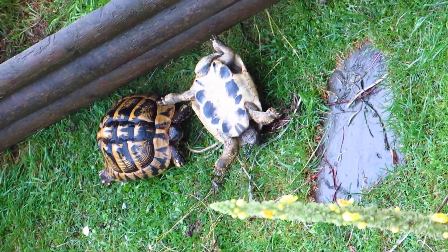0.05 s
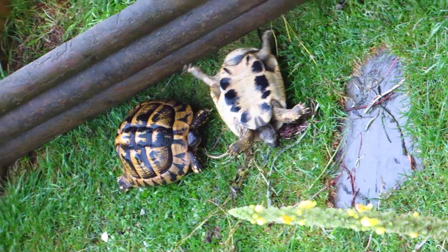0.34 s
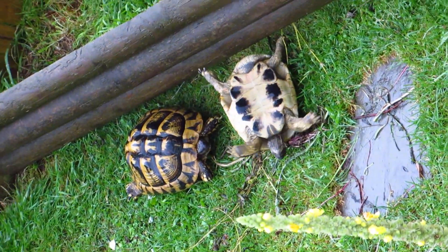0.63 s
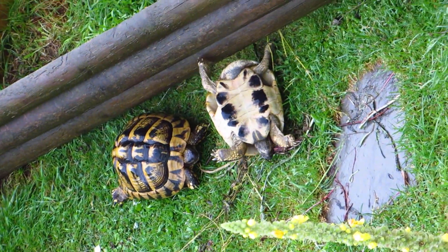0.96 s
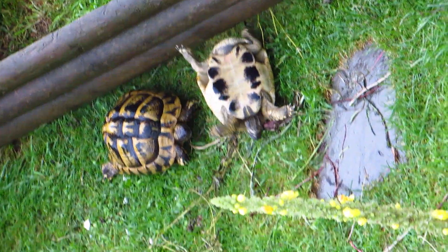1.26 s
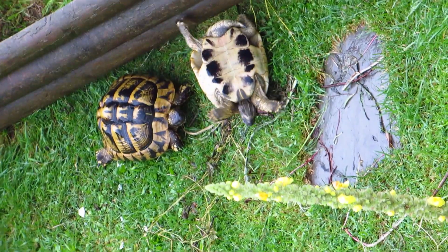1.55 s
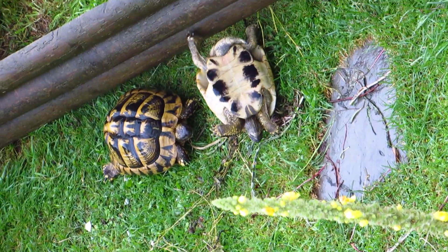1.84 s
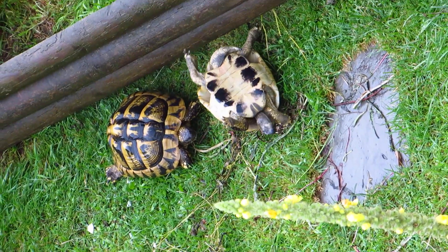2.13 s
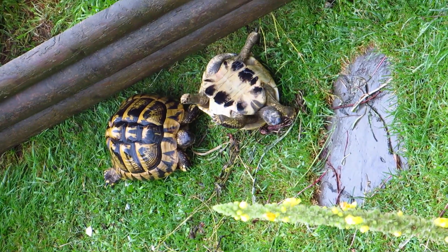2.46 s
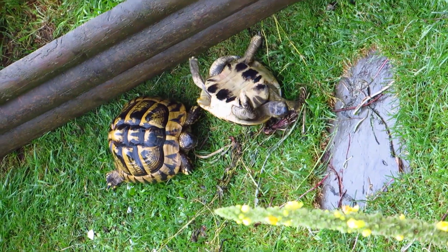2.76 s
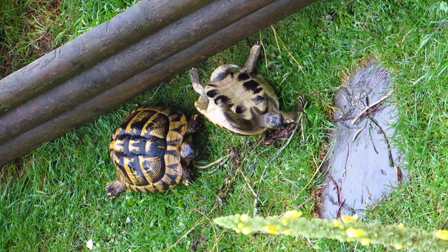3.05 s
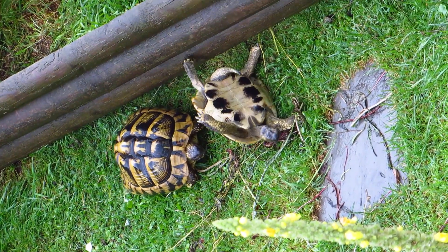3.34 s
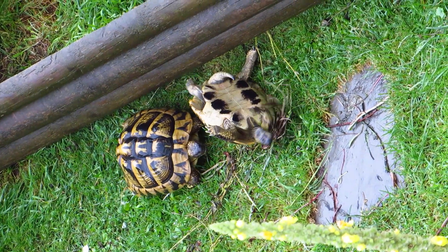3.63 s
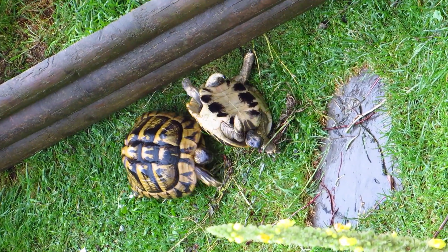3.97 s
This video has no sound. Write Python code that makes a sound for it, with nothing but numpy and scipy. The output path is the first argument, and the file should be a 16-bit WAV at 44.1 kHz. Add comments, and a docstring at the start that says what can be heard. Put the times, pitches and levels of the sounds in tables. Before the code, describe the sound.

A tortoise's faint claw taps and scuffs, then a hollow shell knock, over outdoor hiss.

```python
"""Outdoor air hisses under a camera's thin, steady whine, and small dry ticks begin: two tortoises are on
a lawn by a wooden rail, and one lies on its back, rowing with its legs. Claws tap and scuff on shell,
wood and grass. A breeze puffs twice and a distant rumble swells once. At last the hollow shell rocks
over against something hard and rings with a quick double knock."""
import sys
import numpy as np
from scipy import signal
from scipy.fft import rfft, irfft, next_fast_len
from scipy.io import wavfile
from scipy.ndimage import map_coordinates

SR = 44100
rng = np.random.default_rng(int(sys.argv[2]) if len(sys.argv) > 2 else 0)


def wav_record(signal):
    """Record a signal, one row per channel, as 16-bit PCM in the file named by sys.argv[1]."""
    frames = np.transpose(np.atleast_2d(signal))
    bounded = np.clip(frames, -1, 1)
    # unit amplitude maps onto the largest positive 16-bit level
    quanta = np.round(bounded * 32767).astype(np.int16)
    wavfile.write(sys.argv[1], SR, quanta)


N = 176400

# tone of the open-air hiss: (frequency [Hz], relative level [dB])
AIR_COLOUR = [(22, -25), (35, -20.5), (50, -5), (61, 2), (76, -6.5), (110, -3.5), (250, -4), (400, -3),
              (500, -7), (640, -2.5), (810, -0.5), (1000, -3.5), (1600, -3.5), (2600, -7), (4000, -10.5),
              (6000, -15), (8500, -19.5), (12000, -25.5), (15000, -29)]
# stereo width of the ambience: (frequency [Hz], left-right correlation [-1..1])
AMBIENCE_CORRELATION = [(60, 0.31), (110, 0.15), (200, -0.14), (380, -0.47), (700, -0.45), (1290, -0.091),
                        (2380, 0.2), (4400, 0.31), (8120, -0.093), (15000, -0.33)]
# the ambience's low end leans right: (frequency [Hz], left minus right [dB])
AMBIENCE_BALANCE = [(60, -3), (250, -1.4), (700, -.5), (2500, 0)]
# swell of the distant rumble: (time [s], level [dB])
RUMBLE_SWELL = [(0, -75), (1.2, -95), (1.55, -55.5), (1.9, -49), (2.15, -55), (2.6, -56), (3.2, -64),
                (4, -64)]
# its dark tone: (frequency [Hz], relative level [dB])
RUMBLE_COLOUR = [(20, -10), (55, -10), (130, -4.5), (270, -5), (450, -12), (900, -12), (3000, -59)]
# breeze on the microphones: (time [s], level [dB])
BREEZE_PUFFS = [(0, -75), (1.2, -66), (1.37, -52.5), (1.55, -76), (1.85, -58), (2.1, -76), (4, -86)]
# its bass-heavy tone: (frequency [Hz], relative level [dB])
BREEZE_COLOUR = [(20, -17), (50, 3), (75, 1), (160, -25), (600, -70)]
# the whine, then its octave: (left level [dB], right level [dB], right lag [rad])
WHINE_PARTIALS = [(-45, -54.5, -0.13), (-81, -71, 1.4)]
# grass stirred by the struggle: (time [s], level [dB])
RUSTLE_LEVEL = [(0, -62), (1.9, -56), (2.3, -55), (2.75, -53), (3.1, -55.5), (3.4, -52.5), (3.62, -54.5),
                (3.82, -49), (4, -56)]
# its papery tone: (frequency [Hz], relative level [dB])
RUSTLE_COLOUR = [(200, -8), (700, -3.5), (1400, -4), (3000, -7), (7000, -9.5), (15000, -29)]
# the garden's scattered tail: (frequency [Hz], t60 [s])
GARDEN_DECAY = [(200, 0.39), (900, 0.1), (3000, 0.14), (10000, 0.06)]
# a leg drags through grass or over shell: (time [s], length [s], level [dB], centre [Hz])
LEG_SCUFFS = [(0.114, 0.027, -46.5, 1060), (0.621, 0.021, -45, 1510), (0.778, .02, -49, 2460),
              (0.833, 0.0091, -45, 3340), (0.941, .01, -50.5, 5500), (1.001, .03, -47.5, 2470),
              (1.661, 0.023, -48, 2030), (2.299, 0.0066, -41, 6130), (2.298, .025, -49, 3820),
              (2.642, 0.02, -46, 2480), (2.666, 0.064, -49.5, 910), (2.782, 0.024, -44.5, 2770),
              (2.82, 0.017, -55, 3330), (3.032, 0.019, -48, 2200), (3.214, 0.018, -46, 2870),
              (3.296, .014, -46, 2600), (3.442, 0.014, -43.5, 1370), (3.493, 0.014, -46.5, 1600),
              (3.779, 0.031, -49.5, 1630), (3.828, 0.028, -52, 3080), (3.939, 0.0077, -44, 5660)]
# a claw hits something hard: (time [s], gain [dB], low-pass [Hz], pitch of the struck spot [ratio])
CLAW_TAPS = [(.126, -38, 1400, .93), (.627, -36, 2400, 0.95), (.836, -32.5, 6000, 1.6),
             (1.665, -32.5, 4500, 1.2), (2.2497, -27.5, 5470, 1.03), (2.257, -34.5, 1100, .75),
             (2.449, -33, 4500, 1.5), (2.723, -23.5, 5000, 0.99), (2.8688, -29, 4000, 0.92),
             (2.8708, -27, 5500, 1.1), (3.494, -28.5, 8100, 1.3)]
# resonances of a tap at pitch ratio 1: (frequency [Hz], relative level [dB], t60 [s])
TAP_MODES = [(378, -18, 0.036), (666, -14.5, 0.023), (1186, -7.5, 0.016), (1585, -9.5, 0.017),
             (3620, -2, 0.0018), (5260, -3.5, 0.0017)]
# the rocking shell lands: (time [s], gain [dB], high-pass [Hz], low-pass [Hz])
SHELL_KNOCKS = [(3.7043, -23.5, 1300, 1880), (3.7112, -21, 200, 990)]
# resonances of the hollow shell: (frequency [Hz], relative level [dB], t60 [s])
SHELL_MODES = [(189, -16.5, 0.25), (234, -12.5, .08), (309, -18, 0.15), (417, -20, 0.079), (630, -15, 0.15),
               (762, -18, 0.15), (823, -10.5, 0.14), (876, 1.5, 0.054), (953, -13, 0.079),
               (1144, -5, 0.051), (1480, -15, 0.051), (1646, -10.5, 0.071)]

AIR_DB, WHINE_HZ, TOP_HZ = -43.5, 7866.8, 15780
SCUFF_Q, GRAIN_DB, GRAINS_PER_S = 1.67, 3.5, 620
CRACK_DB, CRACK_T60_S = -8.5, 0.0047
TAP_LOW_HZ = 294  # a claw is too light to excite much bass
ECHO_S, ECHO_DB, ECHO_TOP_HZ = 0.0022, -7.5, 2600
KNOCK_RISE_S, KNOCK_PAN_DB = 0.00057, -1.3
LEG_WET_DB, KNOCK_WET_DB = -1.5, -11


def amp(db):
    """Decibels to gain."""
    return 10 ** (np.asarray(db) / 20)


def unit(x):
    """Scale to rms 1."""
    return x / np.sqrt(np.mean(x ** 2) + 1e-20)


def along(points, hz):
    """Read (frequency, value) points along a log-frequency axis."""
    freqs, values = np.transpose(points)
    return np.interp(np.log(hz + 1), np.log(freqs + 1), values)


def curve(points):
    """Draw (time, value) points as one value per sample."""
    return np.interp(np.arange(N) / SR, *np.transpose(points))


def wobble(per_s):
    """Smooth random movement through per_s points a second."""
    knots = rng.standard_normal(int(N * per_s / SR) + 4)
    return map_coordinates(knots, [np.arange(N) * per_s / SR])


def filtered(x, response):
    """Equalise x with a gain that is a function of frequency."""
    size = next_fast_len(N + SR // 2)
    return irfft(rfft(x, size) * response(np.fft.rfftfreq(size, 1 / SR)), size)[..., :N]


def add(track, start_s, sound):
    """Mix a sound into the track at start_s."""
    part = track[round(start_s * SR):][:len(sound)]
    part += sound[:len(part)]


def ring(modes, t, scatter_db):
    """Damped modes, each struck a little harder or softer every time."""
    return sum(amp(db + scatter_db * rng.standard_normal() - 60 * t / t60) * np.cos(2 * np.pi * hz * t)
               for hz, db, t60 in modes)


def contact(x, low_hz, high_hz, order):
    """The band that a contact excites: light ones lack bass, soft ones lack treble."""
    x = signal.lfilter(*signal.butter(2, low_hz, "high", fs=SR), x)
    return signal.lfilter(*signal.butter(order, high_hz, fs=SR), x)


def diffuse_noise(colour):
    """Wide, coloured stereo noise of rms 1."""
    def mid_side_gains(hz):
        angle = np.arccos(along(AMBIENCE_CORRELATION, hz)) / 2
        return amp(along(colour, hz)) * [np.cos(angle), np.sin(angle)]
    mid, side = filtered(rng.standard_normal((2, N)), mid_side_gains)
    return unit(np.array([mid + side, mid - side]))


def garden_reverb(x, wet_db):
    """The direct sound plus a short scattered tail in each ear."""
    hz, t, noise = signal.stft(rng.standard_normal((2, SR // 3)), SR, nperseg=256)
    decay = amp(-60 * t / along(GARDEN_DECAY, hz)[:, None])
    tail = signal.istft(noise * decay, SR, nperseg=256)[1]
    wet = signal.fftconvolve(x[None], tail, axes=1)[:, :N]
    return x + amp(wet_db) * unit(wet) * x.std()


def air_hiss():
    """A steady bed of outdoor air."""
    return amp(AIR_DB) * diffuse_noise(AIR_COLOUR)


def distant_rumble():
    """Dark, far-off noise that swells once and wavers as it fades."""
    return amp(curve(RUMBLE_SWELL) + 1.1 * wobble(per_s=7.85)) * diffuse_noise(RUMBLE_COLOUR)


def breeze():
    """Two soft, bassy puffs of wind buffet the microphones."""
    return amp(curve(BREEZE_PUFFS)) * diffuse_noise(BREEZE_COLOUR)


def camera_whine(flutter_db=0.4):
    """A thin electronic tone, stronger on the left, with a faint octave."""
    phase = 2 * np.pi * WHINE_HZ * np.arange(N) / SR
    tone = sum(np.array([amp(left) * np.sin(k * phase), amp(right) * np.sin(k * phase - lag)])
               for k, (left, right, lag) in enumerate(WHINE_PARTIALS, 1))
    return tone * amp(flutter_db * wobble(per_s=7.2))


def grass_rustle(flicker_db=2.5):
    """The struggle stirs the grass: a flickering rustle that slowly builds."""
    return amp(curve(RUSTLE_LEVEL) + flicker_db * wobble(per_s=35)) * diffuse_noise(RUSTLE_COLOUR)


def leg_scuffs():
    """Dragging legs: short gritty strokes that swell and fade, each in one broad resonance."""
    out = np.zeros(N)
    grit = rng.standard_normal(N) * amp(GRAIN_DB * wobble(GRAINS_PER_S))
    for start_s, length_s, db, hz in LEG_SCUFFS:
        swell = np.sin(np.linspace(0, np.pi, int(length_s * SR)))
        friction = grit[round(start_s * SR):][:len(swell)]
        b, a = signal.iirpeak(hz, SCUFF_Q, SR)
        stroke = signal.lfilter(b, a, signal.lfilter(b, a, friction))
        add(out, start_s, amp(db) * unit(stroke) * swell)
    return garden_reverb(out, LEG_WET_DB)


def claw_taps():
    """Claws tick on shell and wood: a crack, a few dead modes and a duller bounce off a close surface."""
    out, t = np.zeros(N), np.arange(SR // 20) / SR
    for start_s, db, bright_hz, pitch in CLAW_TAPS:
        crack = amp(CRACK_DB - 60 * t / CRACK_T60_S) * rng.standard_normal(len(t))
        body = ring(TAP_MODES, pitch * t, scatter_db=1)  # higher spots also die sooner
        tick = amp(db) * contact(body + crack, TAP_LOW_HZ, bright_hz, order=2)
        echo = amp(ECHO_DB) * contact(tick, TAP_LOW_HZ, ECHO_TOP_HZ, order=1)
        add(out, start_s, tick)
        add(out, start_s + ECHO_S, echo)
    return garden_reverb(out, LEG_WET_DB)


def shell_knocks():
    """A light touch, then the full weight: both ring the hollow shell, just right of centre."""
    out, t = np.zeros(N), np.arange(SR // 4) / SR
    attack = 1 - np.exp(-t / KNOCK_RISE_S)  # the contact builds up
    for start_s, db, low_hz, high_hz in SHELL_KNOCKS:
        shell = ring(SHELL_MODES, t, scatter_db=0.5) * attack
        add(out, start_s, amp(db) * contact(shell, low_hz, high_hz, order=3))
    return garden_reverb(out, KNOCK_WET_DB) * amp([[KNOCK_PAN_DB], [-KNOCK_PAN_DB]])


def scene():
    """The struggling tortoise up front, over the garden ambience and the whine."""
    tortoise = shell_knocks() + claw_taps() + leg_scuffs()
    ambience = air_hiss() + distant_rumble() + grass_rustle() + breeze()
    ambience = filtered(ambience, lambda hz: amp(along(AMBIENCE_BALANCE, hz) * [[0.5], [-0.5]]))
    return tortoise + ambience + camera_whine()


def record(dry):
    """The camera's band limit: a hard cut of the highest treble."""
    return filtered(dry, lambda hz: hz < TOP_HZ)


dry = scene()
out = record(dry)
wav_record(out)
```